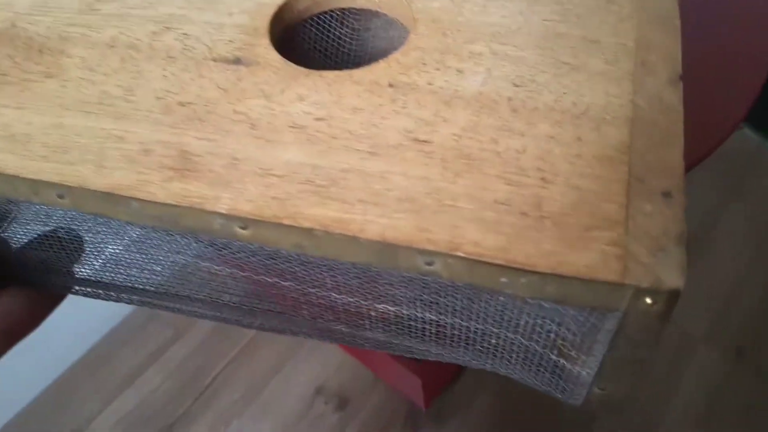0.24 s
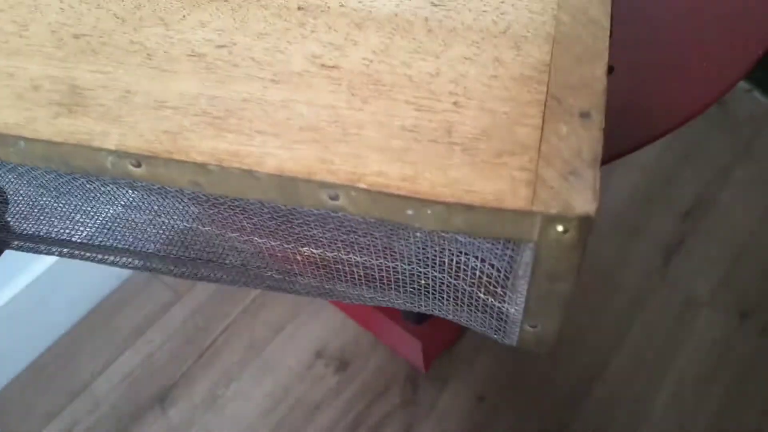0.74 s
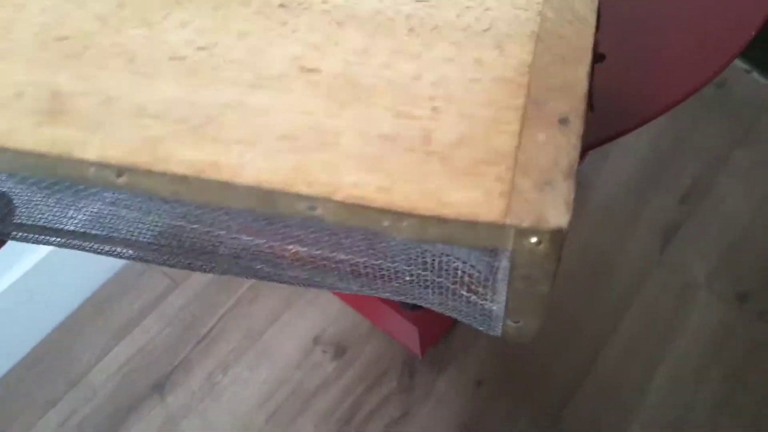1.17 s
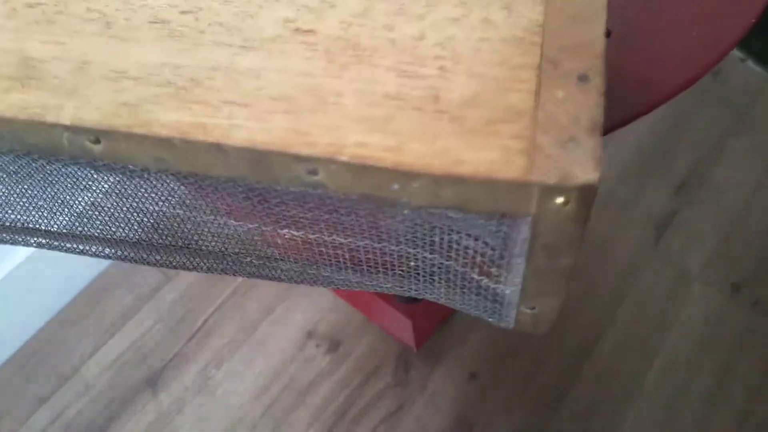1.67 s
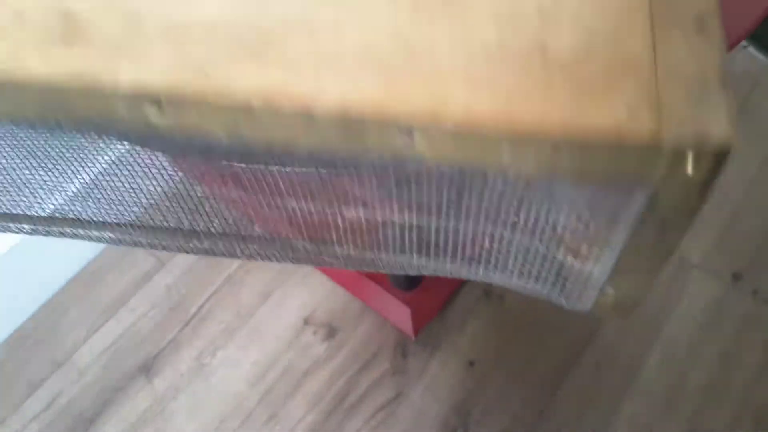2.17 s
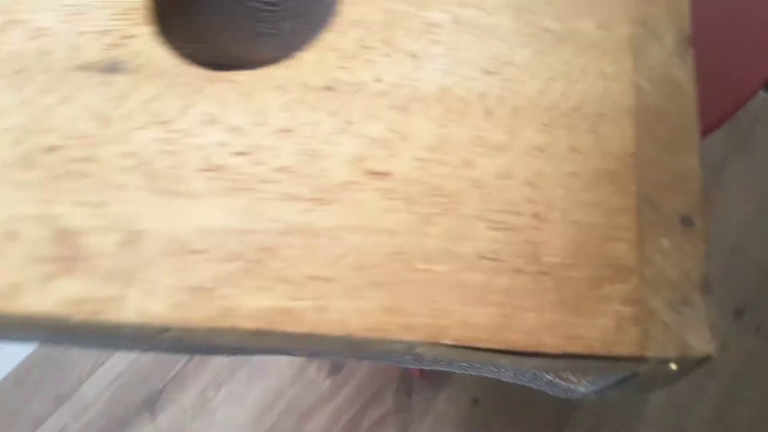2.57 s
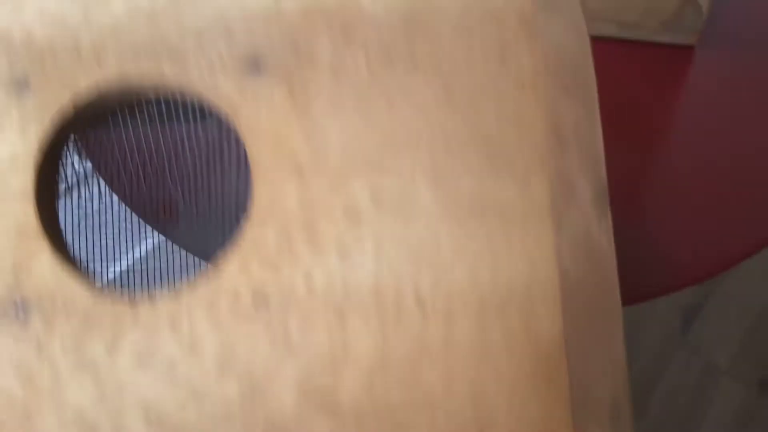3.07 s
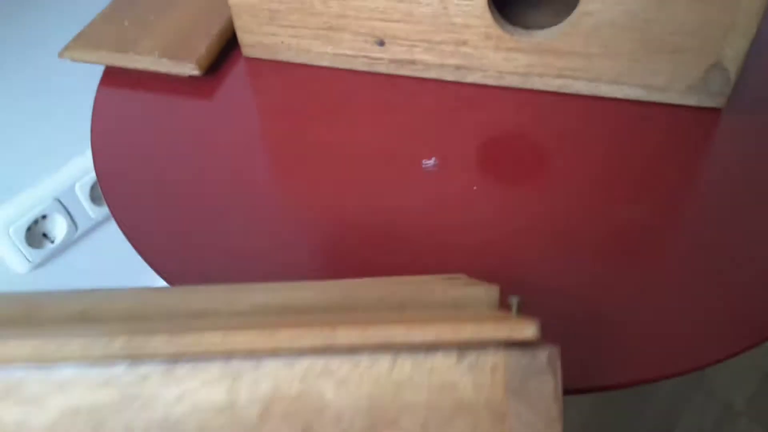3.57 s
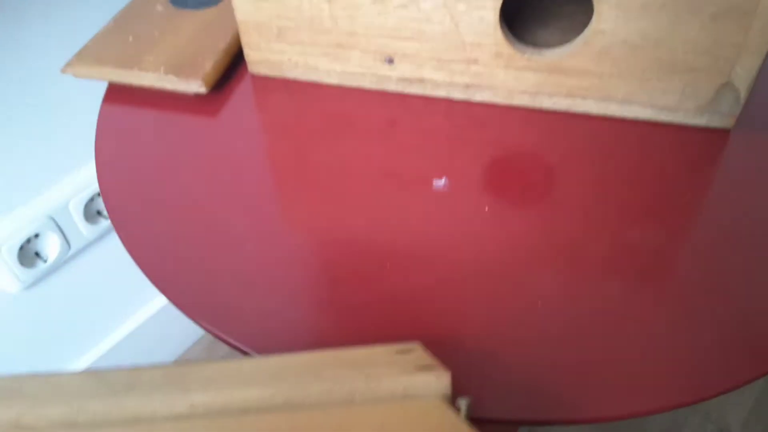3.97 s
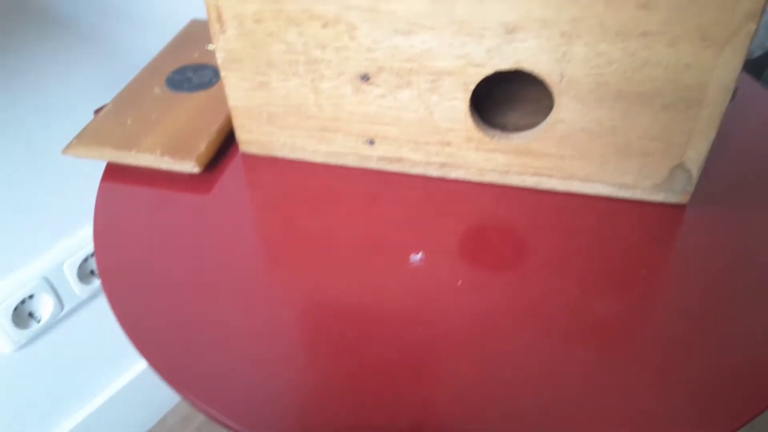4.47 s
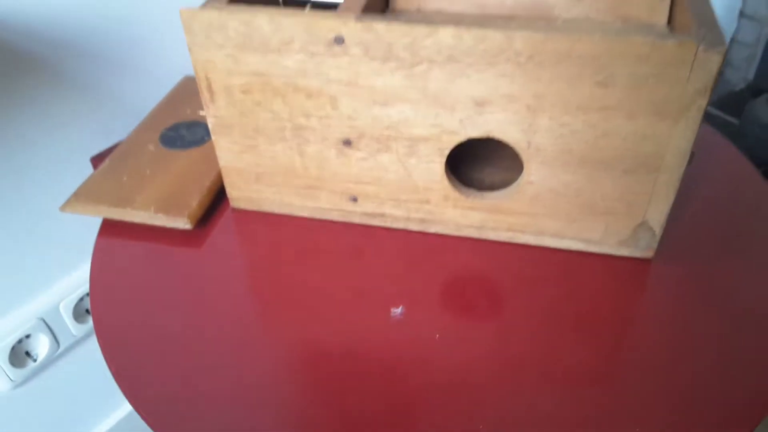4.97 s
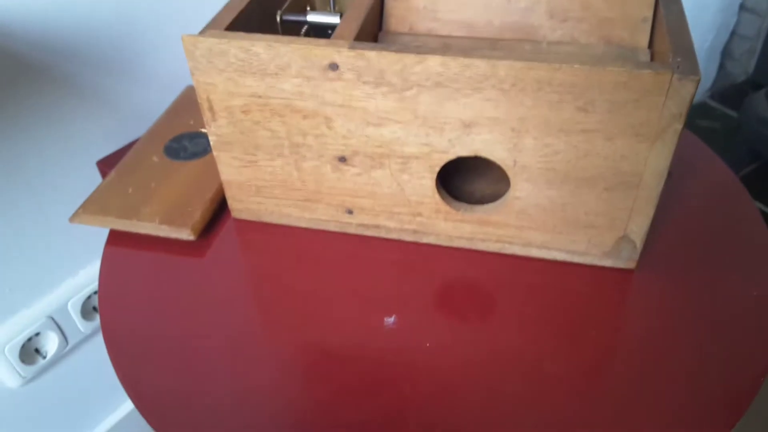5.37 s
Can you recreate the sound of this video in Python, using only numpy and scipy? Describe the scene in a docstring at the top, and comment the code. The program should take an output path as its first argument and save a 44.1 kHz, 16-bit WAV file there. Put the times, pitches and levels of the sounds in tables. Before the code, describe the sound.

A spring-driven motor runs throughout in a wooden box on a table, a rough, rapid gear whir fluttering about sixteen times a second. A brief creak and hard wooden knocks come within the first second; later a hand drags and a panel scrapes and thuds. Close microphone in a small room, finally rising over the open top, where the ticking brightens.

```python
"""Clockwork motor in a wooden box

A spring-driven motor whirs in a box on a table: gear teeth strike and rub on every turn of the governor
shaft, about sixteen turns a second, and excite the resonances of frame, box and small steel parts.
A hand grips the box, knocks a panel against it and slides along the wood: filtered noise and struck modes.
The microphone moves between the mesh side and a wooden side, and at last rises over the open top."""
import sys
import numpy as np
from scipy import signal
from scipy.fft import rfft, irfft
from scipy.io import wavfile

SR = 44100
rng = np.random.default_rng(int(sys.argv[2]) if len(sys.argv) > 2 else 0)


def waveform_to_disk(signal):
    """Save audio, clipped to [-1, 1], as 16-bit WAV at the path in sys.argv[1]."""
    frames = np.transpose(np.atleast_2d(signal))
    scaled = np.clip(frames, -1, 1) * 32767
    samples = np.round(scaled).astype(np.int16)
    wavfile.write(sys.argv[1], SR, samples)


N = 247842
TIME = np.arange(N) / SR  # s

# speed of the governor shaft: time_s, speed_turns_per_s
GOVERNOR_SPEED = [(0.0, 15.7), (0.27, 15.305), (0.9, 17.094), (1.63, 17.096), (1.83, 16.488), (2.31, 17.11),
                  (2.62, 15.897), (3.1, 16.389), (3.42, 15.437), (3.97, 15.464), (4.27, 14.547),
                  (4.49, 14.422), (4.89, 15.098), (5.17, 14.527), (5.62, 15.458)]
# microphone round the box: time_s, shaded (0 = at the mesh, 1 = behind wood)
WOOD_SIDE = [(0, 0.34), (1.2, 0.014), (2.4, 0.018), (3.2, 0.42), (4.1, 1), (5.62, 0.49)]
# microphone height: time_s, over_top (0 = below the rim, 1 = over the open top)
OPEN_TOP = [(4.75, 0.024), (5.2, 0.92)]
# gear meshes: tooth contacts per turn of the governor
MESH_ORDERS = [27, 35, 38, 44]
# a lever with play catches and jolts the gears: time_s, ring_level_db, change_of_next_teeth_db
LEVER_CATCHES = [(0.331, -44.5, 4), (.392, -57, 1), (.584, -44, 4.5), (.706, -50, 3.5), (.766, -45, 3),
                 (.825, -40, 0.5), (1.062, -51, 0), (1.234, -48, 2.5), (1.470, -45, 3), (1.585, -44.5, 2),
                 (1.644, -45, 2), (1.703, -50, 0.5), (1.957, -52, 0), (2.003, -47, -0.5), (2.076, -55, -1),
                 (2.122, -42, 3), (2.182, -56, 1.5), (2.241, -48, 0), (2.359, -47.5, 6), (2.54, -46, 1),
                 (2.602, -49, 4), (2.669, -48, 2.5), (2.915, -50, 1), (3.036, -52, 3), (3.097, -53, -2.5),
                 (3.158, -55, 2.5), (3.994, -43, 1.5), (4.125, -49, -0.5), (4.266, -54, 0.5),
                 (4.398, -53, 1.5), (4.877, -53, -1), (4.946, -55, -3), (5.075, -50, 1),
                 (5.144, -48.5, 1.5), (5.282, -52, -2), (5.348, -50, 1), (5.548, -49, 1.5)]


def from_db(db):
    """An amplitude ratio is ten to the power of the level over 20."""
    return 10 ** (np.asarray(db) / 20)


def rms_one(x):
    """Normalisation: equal mean power, rms 1."""
    return x / np.sqrt(np.mean(x ** 2) + 1e-20)


def in_time(rows):
    """Linear interpolation: each column of a curve at every sample."""
    s, *columns = np.transpose(rows)
    return [np.interp(TIME, s, column) for column in columns]


def cut(x, hz, kind, order=2):
    """Butterworth filter: a maximally flat low- or high-pass."""
    sections = signal.butter(order, min(hz, .45 * SR), kind, fs=SR, output="sos")
    return signal.sosfilt(sections, x + 1e-18)


def clicks(times, sizes):
    """Impulsive excitation: one single-sample impulse at each time."""
    inside = (times >= 0) & (times < TIME[-1])
    return np.bincount((times[inside] * SR).astype(int), sizes[inside], N)


def coloured(x, colour):
    """Spectral shaping: a smooth gain over log frequency, which keeps the power of white noise."""
    hz, db = np.transpose(colour)
    bins_hz = np.arange(N // 2 + 1) * SR / N
    gain = from_db(np.interp(np.log(bins_hz + 1), np.log(hz), db))
    return irfft(rfft(x) * rms_one(gain), N)


def noise(colour):
    """Random excitation: noise with a smooth spectrum and rms 1."""
    return rms_one(coloured(rng.standard_normal(N), colour))


def resonate(x, hz, width):
    """Driven damped oscillator: gain 1 at resonance, bandwidth set by the damping."""
    r = np.exp(-np.pi * width / SR)
    numerator = np.array([1, 0, -1]) * (1 - r * r) / 2
    return signal.lfilter(numerator, [1, -2 * r * np.cos(2 * np.pi * hz / SR), r * r], x)


def resonate_moving(x, hz, width):
    """Heterodyning: the band round a moving centre is shifted to zero, low-passed and shifted back."""
    r = np.exp(-np.pi * width / SR)
    carrier = np.exp(2j * np.pi * np.cumsum(hz) / SR)
    return 2 * np.real(carrier * signal.lfilter([1 - r], [1, -r], x / carrier))


def ring(force, modes):
    """Modal superposition: a blow sets each mode in exponentially decaying free vibration."""
    out = np.zeros(N)
    for hz, db, t60 in modes:
        r = np.exp(-np.log(1000) / (t60 * SR))
        w = 2 * np.pi * hz / SR
        out += from_db(db) * signal.lfilter([.5, 0, -.5], [1, -2 * r * np.cos(w), r * r], force + 1e-18)
    return out


def rattle(blow, seconds):
    """Chatter: noise whose energy follows a blow and decays exponentially in the given time constant."""
    fade = np.exp(-1 / (seconds * SR))
    energy = signal.lfilter([1 - fade], [1, -fade], blow ** 2 + 1e-30)
    return np.sqrt(energy) * rng.standard_normal(N)


def pressure(strokes):
    """Sliding contact force: each stroke rises in 6 ms, eases to half, and lets go in 40 ms."""
    total = 0
    for s, length, db in strokes:
        corners_s = [s, s + .006, s + length, s + length + .04]
        total = total + from_db(db) * np.interp(TIME, corners_s, [0, 1, .5, 0])
    return total


def room(x, t60, dull_hz, delay):
    """Diffuse reverberation: convolution with low-passed noise that decays exponentially."""
    decay = np.exp(-np.log(1000) * TIME / t60)
    tail = cut(rng.standard_normal(N), dull_hz, "low") * decay * (TIME > delay)
    tail_gain = np.sqrt(np.sum(tail ** 2) * SR / (2 * dull_hz))
    return signal.fftconvolve(x, tail[:SR] / tail_gain)[:N]


def governor_turns():
    """Kinematics: the angle of the shaft, in turns, is the integral of its speed."""
    start_turn = -.4455
    return start_turn + np.cumsum(in_time(GOVERNOR_SPEED)[0]) / SR


def jolts():
    """Transient load: each catch changes the strength of the next teeth, in dB, and fades exponentially."""
    jolt_s = .022  # time constant
    s, _, change_db = np.transpose(LEVER_CATCHES)
    return signal.lfilter([1], [1, -np.exp(-1 / (jolt_s * SR))], clicks(s, change_db) + 1e-18)


def tooth_strokes(times, sizes, rub_db, rub_s, same):
    """Impact and friction: a click, then a decaying rub over a flank partly the same on every turn."""
    age = np.arange(SR // 60)  # samples since landing
    repeated = rng.standard_normal((times.shape[1], len(age)))
    fresh = rng.standard_normal((*times.shape, len(age)))
    flank = np.sqrt(same) * repeated + np.sqrt(1 - same) * fresh
    fade = np.sqrt(np.exp(-age / (rub_s * SR)) / (rub_s * SR))  # rub_s: time constant of the energy
    stroke = (age == 0) + from_db(rub_db) * flank * fade
    return rms_one(clicks(times[..., None] + age / SR, sizes[..., None] * stroke))


def tooth_forces():
    """Quasi-periodic excitation: teeth land at fixed places in the turn, with scatter, over steady brake hiss."""
    # tooth contacts: place_in_turn, body_db, ring_db, fine_tick_db, gain_away_from_mesh_db
    teeth = [(.035, -4, 1.5, -15, 3), (.095, -1, 4.5, -10, 0.5), (.155, -2.5, -4.5, -26, 3),
             (0.241, -6, -1.5, -18, -8), (.29, -2, -0.5, -10, -2), (.35, -1, -2.5, -22, 1.5),
             (.405, 2, -1.5, -16, -4), (.46, -1.5, 1.5, -17, 2), (0.636, -5.5, 2.5, -11, -1.5),
             (.68, 0.5, 1.5, -8, 1.5), (.745, -0.5, -3, -13, -4), (.8, -8, -5.5, -16, 2.5),
             (.875, 0, 1.5, -4, 1.5), (.935, 0.5, 1.5, -14, 0.5)]
    # excitation of body, ring and tick: rub_db, rub_energy_decay_s, brake_hiss_db
    contact = [(0, 0.0027, -16.5), (2, 0.0016, -14.5), (10, 0.0012, -24)]
    # the same three parts: stroke_scatter_db, share_of_rub_repeated_each_turn
    unevenness = [(1.6, .25), (1.4, .5), (1.3, .6)]
    landing_jitter_s, turn_scatter_db = .00016, .5
    turns = governor_turns()
    place, *levels, away_db = np.transpose(teeth)
    due = np.arange(-1, np.ceil(turns[-1]))[:, None] + place  # one row per turn
    times = np.interp(due, turns, TIME, left=-1, right=-1)
    times = times + landing_jitter_s * rng.standard_normal(due.shape)
    away_curve = in_time(WOOD_SIDE)[0] + in_time(OPEN_TOP)[0]
    away = np.clip(np.interp(times, TIME, away_curve), 0, 1)
    extra_db = away_db * away + np.interp(times, TIME, jolts())
    extra_db = extra_db + turn_scatter_db * rng.standard_normal((len(due), 1))
    forces = []
    for level, (rub_db, rub_s, brake_db), (scatter_db, same) in zip(levels, contact, unevenness):
        sizes = from_db(level + extra_db + scatter_db * rng.standard_normal(due.shape))
        strokes = tooth_strokes(times, sizes, rub_db, rub_s, same)
        forces.append(rms_one(strokes + from_db(brake_db) * rng.standard_normal(N)))
    return forces


def gear_whine():
    """Mesh frequency: gear meshes hum at whole multiples of the governor speed."""
    # relative level of each mesh: level_db
    mesh_db = [-7.5, 1, -1.5, 3]
    turns = governor_turns()
    return sum(from_db(db) * np.sin(2 * np.pi * k * turns) for k, db in zip(MESH_ORDERS, mesh_db))


def clockwork(whine_db):
    """Forced vibration: gears drive the resonances, level grows with speed, microphone place weights them."""
    # resonances of motor frame and box: pitch_hz, width_hz, level_at_mesh_db, level_behind_wood_db
    frame = [(212, 33, -13, -49), (408.6, 39.6, 0, 0.5), (483, 393, -9, -11), (616, 40, 0.5, 1),
             (758.6, 46, 1, -1), (958, 36, -1, -0.5), (1024, 81, -8.5, -5), (1193, 122, -3.5, 0.5),
             (1163, 690, -20.5, -13), (1633, 122, -15, -25), (1836, 13, -9.5, -8), (2097, 67, -9, -14),
             (2220, 110, -20, -22.5), (2613, 119, -12.5, -10), (3406, 48, -16.5, -13.5),
             (3660, 183, -21.5, -18.5), (4040, 157, -20.5, -21.5), (4338, 152, -18.5, -19.5),
             (5020, 91, -28, -23), (5414, 107, -28, -30), (6460, 270, -29.5, -29.5), (7040, 290, -32, -26),
             (7630, 160, -29, -23.5), (7980, 205, -25, -28.5), (9130, 135, -31.5, -27.5),
             (9960, 140, -41, -31), (11200, 4100, -34.5, -34), (11670, 180, -24.5, -24),
             (13600, 310, -36, -35)]
    # wooden body, metallic ring, fine ticking:
    # level_at_usual_speed_db, gain_per_extra_turn_per_s_db, gain_behind_wood_db, gain_over_top_db
    loudness = [(-51.5, 1.74, 1.94, 0.1), (-58.5, 2, 0.4, -3), (-73, 3, 4, 0)]
    # brightest part of the ticking, shifting as the microphone moves: time_s, pitch_hz
    sheen = [(0.3, 12000), (2.4, 12300), (3.1, 12200), (3.55, 12700), (4.1, 12900), (4.7, 12200)]
    sheen_width_hz, sheen_db = 400, -30
    top_treble_db, top_treble_hz = 5, 5200  # gain over the open top, for resonances above this pitch
    usual_speed = 16  # turns per s
    forces = tooth_forces()
    forces[0] = forces[0] + from_db(whine_db) * gear_whine()
    shaded = np.clip(in_time(WOOD_SIDE)[0], 0, 1)
    over_top = np.clip(in_time(OPEN_TOP)[0], 0, 1)
    faster = in_time(GOVERNOR_SPEED)[0] - usual_speed
    parts = np.zeros((3, N))
    for k, (hz, width, open_db, shaded_db) in enumerate(frame):
        part = np.searchsorted([1500, 10000], hz)  # borders in Hz between body, ring and tick
        heard_db = open_db + shaded * (shaded_db - open_db)
        heard_db = heard_db + over_top * top_treble_db * (hz > top_treble_hz)
        sign = (-1) ** k  # neighbouring modes in opposite phase
        parts[part] += sign * resonate(forces[part], hz, width) * from_db(heard_db)
    parts[2] += resonate_moving(forces[2], in_time(sheen)[0], sheen_width_hz) * from_db(sheen_db)
    motor = 0
    for (db, speed_db, wood_db, top_db), part in zip(loudness, parts):
        level_db = db + speed_db * faster + wood_db * shaded + top_db * over_top
        motor = motor + from_db(level_db) * rms_one(part)
    return motor


def wall_hum(open_db, shaded_db):
    """Resonance: the box wall hums as the slowest mesh nears its pitch, plainest on the wooden side."""
    shaded = np.clip(in_time(WOOD_SIDE)[0], 0, 1)
    mesh = np.sin(2 * np.pi * MESH_ORDERS[0] * governor_turns())
    level_db = open_db + shaded * (shaded_db - open_db)
    return from_db(level_db) * resonate(mesh, hz=413.3, width=12)


def slack():
    """Amplitude modulation: once a turn the load comes off the gears and the whir dips."""
    place, width, dip_db = .565, .11, 5  # place and width in turns
    distance = governor_turns() % 1 - place
    return from_db(-dip_db * np.exp(-(distance / width) ** 2))


def gripping(grain_db, grain_hz):
    """Friction-driven noise: the hand drags on the box, which drones unevenly and rumbles."""
    # the hand shifts its grip: start_s, length_s, box_drone_db, low_rumble_db
    grips = [(0.086, 0.056, -62, -71), (1.874, 0.23, -57.5, -87), (2.238, 0.16, -70.5, -73),
             (2.49, 0.047, -59, -97), (3.268, 0.41, -64.5, -71), (3.559, 0.11, -54, -63.5),
             (3.75, 0.072, -66, -62.5)]
    # spectrum of the drone: pitch_hz, density_db
    drone_colour = [(60, -23), (140, -15), (197, 11), (290, -2), (600, 2), (3000, -63)]
    # spectrum of the rumble: pitch_hz, density_db
    rumble_colour = [(25, -30), (60, -10), (90, 4), (150, -13), (400, -35)]
    grain = from_db(grain_db * rms_one(cut(rng.standard_normal(N), grain_hz, "low")))
    drone_force = pressure([(s, length, db) for s, length, db, _ in grips])
    drone = drone_force * rms_one(grain * noise(drone_colour))
    rumble_force = pressure([(s, length, db) for s, length, _, db in grips])
    return drone + rumble_force * noise(rumble_colour)


def catches():
    """Free vibration after impact: the loose lever rings against the frame; a loose steel part pings."""
    # pings of the steel part: time_s, level_db
    pings = [(0.155, -52), (.352, -55), (3.118, -45), (4.217, -55), (4.427, -52), (4.829, -48.5)]
    # modes of the steel part: pitch_hz, level_db, t60_s
    steel = [(2674, -3.5, .045), (3390, -6, 0.034)]
    # modes of the lever: pitch_hz, level_db, t60_s
    lever = [(761, 2, 0.073), (1140, -12, 0.048), (2134, -10, 0.031), (2620, -18, 0.02)]
    s, db, _ = np.transpose(LEVER_CATCHES)
    ping_s, ping_db = np.transpose(pings)
    return ring(clicks(s, from_db(db)), lever) + ring(clicks(ping_s, from_db(ping_db)), steel)


def creak(at, db, slip_hz, fade_db, hard_hz, softening, count):
    """Stick-slip: a tight joint snaps free and slips a few times, each slip weaker and duller."""
    # modes of the wooden joint: pitch_hz, level_db, t60_s
    joint = [(493, 6, 0.019), (630, -6, 0.03), (1600, -24, 0.0071), (2450, -11, 0.015), (4180, -14.5, 0.05)]
    slips = np.zeros(N)
    for k in range(count):
        slip = clicks(np.array([at + k / slip_hz]), from_db([db - fade_db * k]))
        slips += cut(slip, hard_hz / (1 + softening * k), "low")
    return cut(ring(slips, joint), hz=290, kind="high")


def through_panel(x, count):
    """Dispersion: bending waves cross wood faster at high pitch; all-pass filters smear each blow."""
    for _ in range(count):
        x = signal.lfilter([-.8, 1], [1, -.8], x)
    return x


def knocks(rattle_db, rattle_s):
    """Contact stiffness: the softer the blow, the duller the ring; the loose panel rattles after each."""
    # knocks on the box: time_s, level_db, hardness_hz (corner of the low-pass)
    blows = [(0.5416, -38, 1930), (0.545, -33.5, 635), (0.6546, -34, 2820), (.658, -27.5, 1000),
             (0.666, -37, 600), (0.8545, -21.5, 2530), (0.858, -22.5, 1350), (0.862, -33, 2200),
             (0.874, -30, 600), (1.102, -41, 250), (1.877, -45, 280), (3.537, -27, 220), (3.547, -24, 210),
             (3.559, -35, 198), (3.618, -36, 170), (3.661, -31, 170)]
    # modes of the box: pitch_hz, level_db, t60_s
    box = [(90, -33, 0.25), (204, -17.5, 0.36), (228, -20, 0.23), (360, -23.5, 0.22), (472, -4.5, 0.043),
           (583, -8, 0.024), (705, -8, 0.032), (750, -10, 0.024), (837, -11.5, 0.018), (902, -6, 0.047),
           (1130, -11, 0.072), (1450, -22, 0.059), (1630, -20, 0.007), (2030, -1.5, 0.0039),
           (2860, -7.5, 0.0046), (3440, -13, 0.029), (3980, -7, 0.015), (4730, -4, 0.011)]
    force = np.zeros(N)
    for s, db, hardness_hz in blows:
        blow = clicks(np.array([s]), from_db([db]))
        chatter = from_db(rattle_db) * rattle(blow, rattle_s)
        force += cut(blow + chatter, hardness_hz, "low", order=3)
    return cut(through_panel(ring(force, box), count=10), hz=105, kind="high")


def sliding():
    """Asperity contact: wood scrapes over wood in many tiny uneven contacts and a few hard snags."""
    # slides: start_s, length_s, level_db
    slides = [(3.284, 0.089, -53), (3.392, 0.067, -56), (3.545, 0.085, -55), (3.736, 0.081, -56.5)]
    # snags: time_s, level_db
    hard_snags = [(3.286, -38), (3.3, -27), (3.351, -29), (3.395, -33), (3.737, -47), (3.751, -31),
                  (3.818, -54)]
    # spectrum of the sliding: pitch_hz, density_db
    slide_colour = [(40, -10), (200, -5), (400, 16), (1200, 22.5), (3500, 12), (6000, 4), (8000, 1),
                    (15000, -24)]
    contacts_per_s, spread_db = 800, 2.4
    size_db = spread_db * np.minimum(rng.exponential(1, N), 4)
    sizes = from_db(size_db) * rng.choice([-1, 1], N)
    grit = rms_one(sizes * (rng.random(N) < contacts_per_s / SR))
    s, db = np.transpose(hard_snags)
    snags = clicks(s, from_db(db))
    scrape = pressure(slides) * grit + snags + rattle(snags, seconds=0.0035)
    return coloured(scrape, slide_colour)


def scratch(at, db, hz, seconds):
    """Band-limited friction noise: one thin bright scratch as the wood starts to slide."""
    chatter = rattle(clicks(np.array([at]), from_db([db])), seconds)
    return resonate(chatter, hz, hz / 2)


def bump(at, db, hz, length):
    """Pressure pulse: a Gaussian-windowed cosine, a brief dull bump right at the microphone."""
    age = TIME - at
    return -from_db(db) * np.exp(-(age / length) ** 2) * np.cos(2 * np.pi * hz * age)


def scene():
    """Superposition: motor and handling in a small room, over a faint background noise."""
    # spectrum of the background: pitch_hz, density_db
    floor_colour = [(20, -2), (50, -8.5), (90, 0), (200, 2.5), (500, 0), (1500, 1.5), (5000, -15),
                    (15000, -15.5)]
    motor = clockwork(whine_db=-27.0) - wall_hum(open_db=-70.5, shaded_db=-58)
    motor = slack() * motor + catches()
    motor = motor + from_db(-19) * room(motor, t60=.25, dull_hz=5000, delay=.004)
    blows = knocks(rattle_db=-8.5, rattle_s=0.009)
    blows = blows + creak(at=.487, db=-31, slip_hz=486.0, fade_db=3.0, hard_hz=4450, softening=0.99, count=7)
    blows = blows + from_db(-9) * room(blows, t60=0.42, dull_hz=2470, delay=0.0073)
    handling = sliding() + gripping(grain_db=-0.5, grain_hz=29.8)
    handling = handling + bump(at=4.6996, db=-35.5, hz=327, length=0.002)
    handling = handling + scratch(at=3.7375, db=-20, hz=7500, seconds=.007)
    background = from_db(-65) * noise(floor_colour)
    return (motor + blows + handling + background)[None]


def record(dry):
    """Band limitation: a steep elliptic low-pass removes the top."""
    cutoff_hz = 15750
    return signal.sosfilt(signal.ellip(12, .1, 80, cutoff_hz, fs=SR, output="sos"), dry)


dry = scene()
out = record(dry)
waveform_to_disk(out)
```